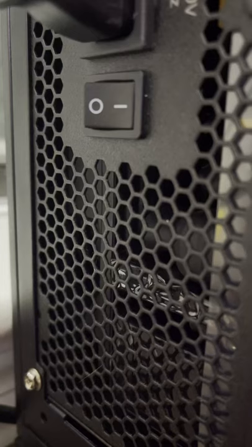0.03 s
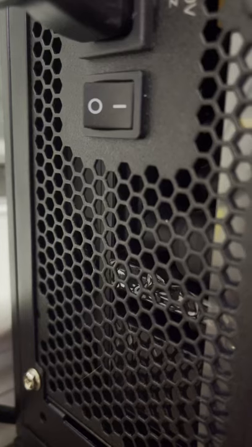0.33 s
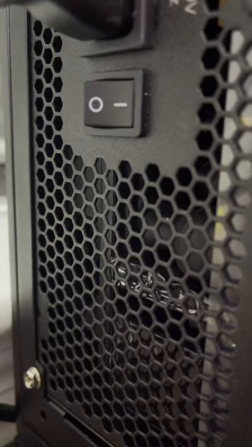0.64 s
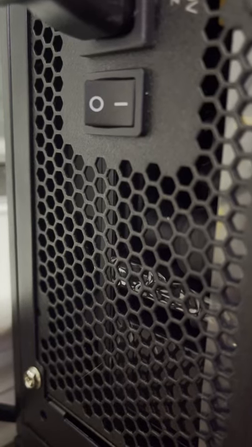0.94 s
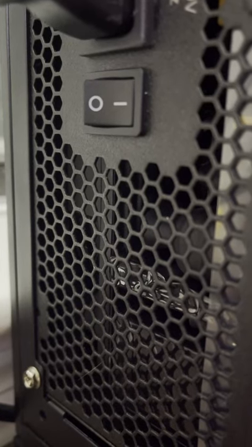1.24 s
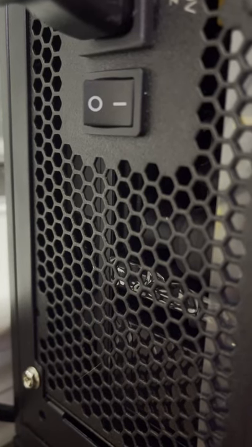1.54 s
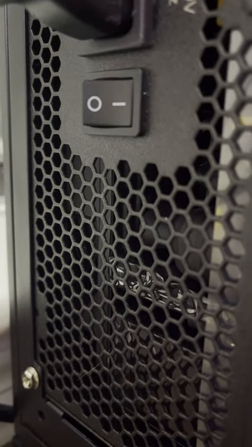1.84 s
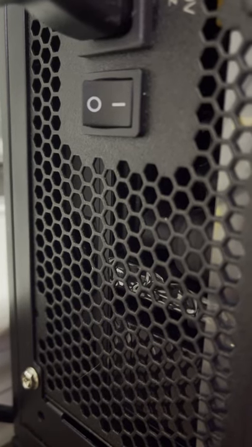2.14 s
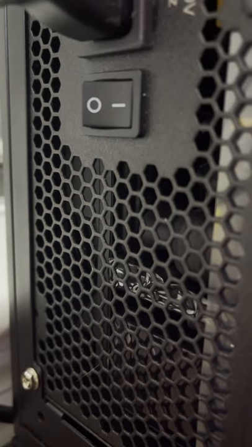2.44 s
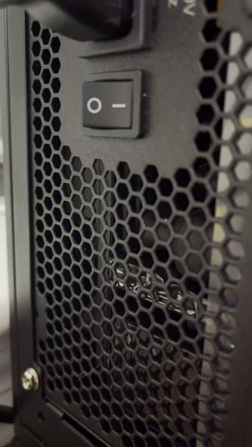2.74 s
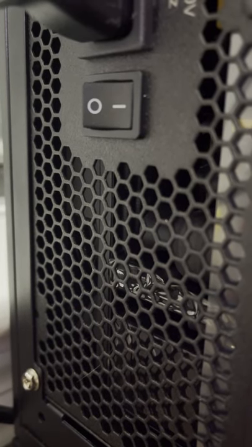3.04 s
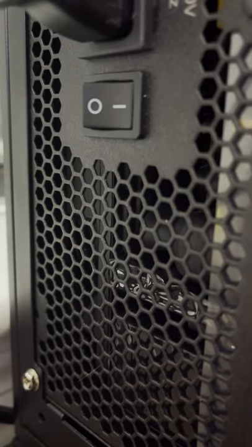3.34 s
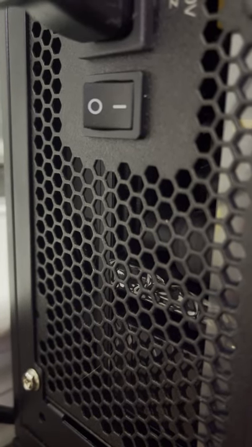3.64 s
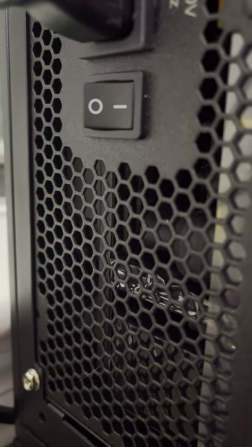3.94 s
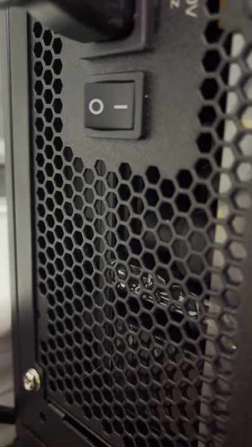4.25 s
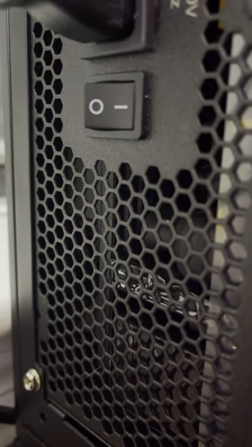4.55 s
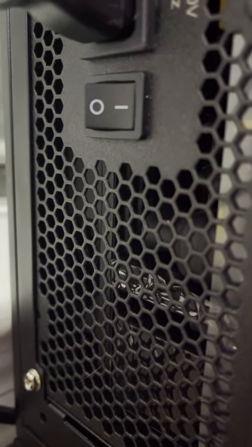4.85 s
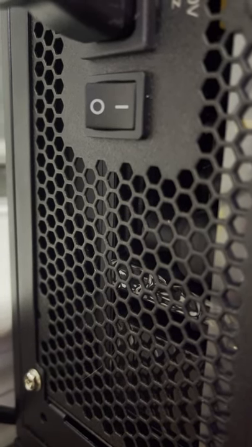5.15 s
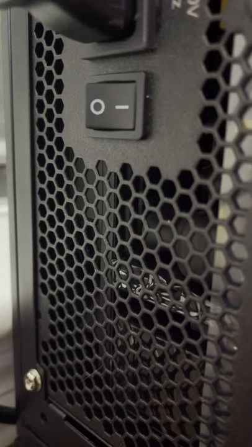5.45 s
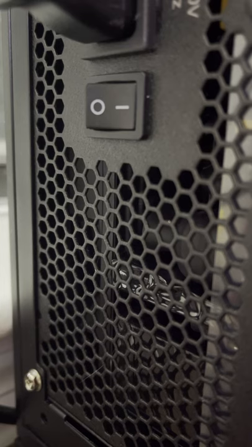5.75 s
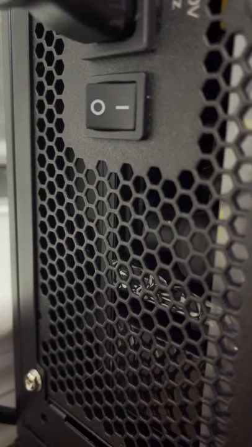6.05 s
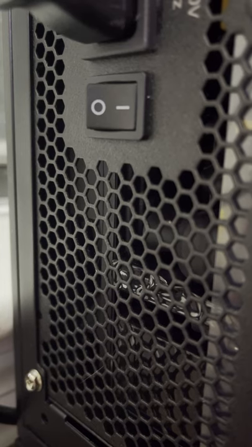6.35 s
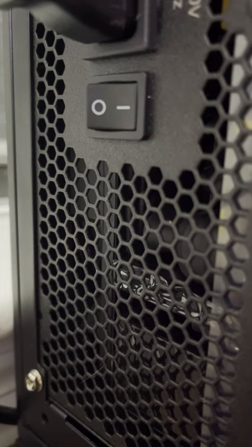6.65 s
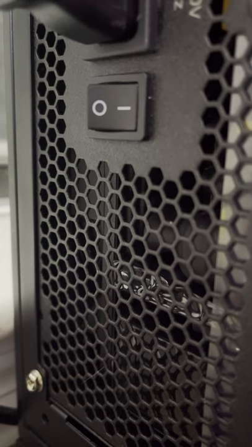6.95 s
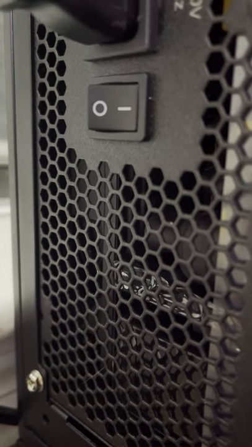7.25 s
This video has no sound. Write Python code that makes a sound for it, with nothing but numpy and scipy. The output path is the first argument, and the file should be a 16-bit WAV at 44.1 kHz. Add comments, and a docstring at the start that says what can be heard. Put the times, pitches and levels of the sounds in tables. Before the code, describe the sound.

From the start to the end, about seven and a half seconds later, a computer's fans make a soft, steady, low rush of air, heard in stereo close to the power supply grille in a quiet room. A faint low hum is blended into the air, its tones slowly swelling and fading as two fans turn at almost the same speed. On top, quieter than the air, the power supply's coils make a continuous fine electrical buzz with a high sizzle and a thin whine. The buzz rasps slightly harder for an instant at about 0.6 and 2.7 seconds, and more faintly at 5.8 and 6.9 seconds. Its ringing edge grows a little until about 3.5 seconds, then eases. At around 7.3 seconds the buzz and whine dip twice very quickly and return, while the fans keep running evenly.

```python
"""Computer fans push a low rush of air through the case, heard close to the power supply grille.
The room is quiet. The fans hum faintly; two spin at almost the same speed, so their blade tones
slowly swell and fade together. The power supply's coils buzz and whine as the current through them
pulses 144 times a second, and they go quieter for a moment near the end, when less is drawn."""
import sys
import numpy as np
from scipy import signal
from scipy.fft import rfft, irfft
from scipy.io import wavfile

SR = 44100
rng = np.random.default_rng(int(sys.argv[2]) if len(sys.argv) > 2 else 0)


def wav_out(sig):
    """Save sig, one row per channel (or a flat mono array), as 16-bit PCM at SR to the path in sys.argv[1]."""
    wavfile.write(sys.argv[1], SR, np.round(np.clip(np.atleast_2d(sig).T, -1, 1) * 32767).astype(np.int16))


N = 326340
TIME, FREQ = np.arange(N) / SR, np.fft.rfftfreq(N, 1 / SR)
LOAD_HZ = 143.92  # pulses of current each second


def amp(db):
    """Turns decibels into a number to multiply by."""
    return 10 ** (np.asarray(db) / 20)


def unit(x):
    """Scales a signal to an average size (rms) of one."""
    return x / np.sqrt(np.mean(x ** 2) + 1e-20)


def across(points):
    """Joins (f/Hz, value) points into a curve over all frequencies, on a log axis."""
    hz, value = np.transpose(points)
    return np.interp(np.log(FREQ + 1), np.log(hz + 1), value)


def bell(hz, width):
    """One resonance: a hump around hz, with height 1."""
    return 1 / (1 + (2 * (FREQ - hz) / width) ** 2)


def modes(table):
    """Several resonances in one curve; their powers add."""
    return np.sqrt(sum((amp(db) * bell(hz, width)) ** 2 for hz, width, db in table))


def drift(per_s):
    """Slow random wandering, with an average size of one."""
    steps = TIME[::64]
    hz = np.fft.rfftfreq(len(steps), steps[1])
    slow = rfft(rng.standard_normal(len(steps))) * np.exp(-(hz / per_s) ** 2) * (hz > 0)
    return np.interp(TIME, steps, unit(irfft(slow, len(steps))))


def ring(x, gain):
    """Filters x so that resonances ring after each push, never before it."""
    log_gain = np.log(np.maximum(gain, 1e-5))
    cepstrum = irfft(log_gain, N) * (1 + np.sign(N / 2 - np.arange(N)))
    return irfft(rfft(x) * np.exp(log_gain + 1j * rfft(cepstrum).imag), N)


# how far the left side runs ahead of the right (f/Hz, lead/radians)
LEFT_LEAD = [(230, 0), (430, 0.17), (600, 0.66), (690, 0.62), (850, 1.84), (950, 1.5), (1035, 1.7),
             (1130, 4.5), (1250, 5.5), (1500, 5.5), (1800, 6.3), (2040, 6.3), (2350, 6), (2670, 7.5),
             (2890, 6.1), (3000, 8.7), (3130, 6.4), (3420, 6.4), (3580, 8.4), (3720, 6.6), (4000, 6.9),
             (4190, 5.7), (4330, 8.6), (4450, 8.1), (4650, 8.3), (4830, 9.4), (5200, 11), (5600, 12.5),
             (6500, 12.8), (7050, 13.9), (8000, 14.8), (8700, 15.65), (9550, 15.75), (9750, 16.2),
             (10400, 16.9), (11250, 17.7), (11900, 18.7), (13200, 18.9), (13600, 19.4)]
# how alike the two sides sound (f/Hz, likeness/0-1)
LIKENESS = [(220, 1), (320, .96), (520, .88), (600, .93), (750, .52), (840, .85), (930, .4), (1030, .8),
            (1200, .35), (1500, .76), (1800, 1), (2040, .98), (2430, .15), (2700, .75), (2870, .9),
            (2960, .35), (3300, .87), (3600, .4), (3850, .35), (4060, .86), (4250, .3), (4450, .65),
            (4700, .45), (4880, .92), (5400, .72), (5700, 1), (6250, .98), (6900, .65), (7100, .82),
            (7800, .62), (8200, .92), (8800, 1), (9550, 1), (9950, .78), (10400, .91), (10850, .97),
            (11600, .89), (12000, .97), (13200, .97), (13600, .72)]
# how much louder the left side is (f/Hz, level/dB)
LEFT_LOUDER = [(230, 0), (300, 1.5), (430, 3.5), (550, 5), (710, 0), (860, 1), (920, 5.5), (1050, 7),
               (1150, 1.5), (1320, 3.5), (1520, 3.3), (1680, -0.5), (2020, 0), (2150, -3.3), (2470, -2.5),
               (2570, 5), (2760, 3), (2930, -7), (3060, 1.5), (3300, -1), (3530, -5.5), (3700, 0),
               (4200, -2), (4420, 4.5), (5000, -2), (5400, 1), (5700, -1)]

def stereo(direct, scattered, bass_apart=0.033):
    """Direct sound reaches two microphones out of step; scattered sound makes them less alike."""
    side = np.array([[1], [-1]])
    apart = np.clip(1 + bass_apart - np.exp(-(FREQ / 220) ** 4), 0, 1)  # long waves reach both alike
    same = 1 - apart * (1 - np.clip(across(LIKENESS), 0, 1))
    pair = np.sqrt((1 + same) / 2) * rfft(direct) + side * np.sqrt((1 - same) / 2) * rfft(scattered)
    lean = amp(side * apart * across(LEFT_LOUDER) / 2)
    lean = lean / np.sqrt(np.mean(lean ** 2, axis=0))
    right_lag = np.exp(1j * np.array([[0], [-1]]) * apart * across(LEFT_LEAD))
    return irfft(pair * lean * right_lag, N)


# how strong the rushing air is, from low to high (f/Hz, relative level/dB)
AIR_COLOUR = [(20, -23), (38, -14.5), (68, -0.5), (102, -5.5), (175, -4.5), (230, -8), (310, -11),
              (420, -14.5), (660, -17), (900, -20.5), (1300, -28.5), (2000, -36), (3000, -44), (14000, -54)]
# pitches that the hollow case boosts or cancels (f/Hz, width/Hz, boost/dB)
CASE_RESONANCES = [(98, 11, -3.5), (138, 12, -2), (242, 21, -2.5), (590, 100, 1.4), (661, 45, -5.5),
                   (700, 91, 3), (823, 44, 3), (1017, 86, 5.5), (1170, 53, -2), (1225, 78, 2),
                   (1360, 55, -1), (1460, 32, 4.5), (2020, 130, 4.5)]

def rushing_air(level_db=-42, gust_db=0.7, gusts_per_s=7):
    """Air swirls at the blades and grille, and the hollow case shapes the noise."""
    colour = amp(across(AIR_COLOUR) + sum(db * bell(hz, width) for hz, width, db in CASE_RESONANCES))
    rush = unit(ring(rng.standard_normal((2, N)), colour))
    gusts = amp(gust_db * drift(gusts_per_s))
    return amp(level_db) * stereo(*(rush * gusts))


# tones of a fan and its twin; a negative strength means the twin works against the fan
# (multiple of the blade rate, main fan's level/dB, twin's relative strength)
TWIN_TONES = [(1, -53, -0.038), (2, -66.5, 0.17), (3, -63, 0.9), (4, -56.5, 0.58), (5, -72.5, 0.4),
              (6, -80, 0.086), (7, -66.5, -0.42), (8, -78, 0.3)]
# how much faster the twin's blades go by (t/s, extra f/Hz)
TWIN_EXTRA_SPEED = [(0, 0.32), (1.8, 0.2), (3, 0.17), (4.9, 0.1), (7.4, 0.18)]
# hums of the other fans, the mains power and the panels they shake (f/Hz, level/dB)
CASE_HUMS = [(58.5, -54.5), (69.3, -52.5), (80.7, -49), (84.8, -54), (107.7, -55), (119.8, -53),
             (150.7, -56), (168.9, -54.5), (187.1, -57), (219, -69.5), (258.4, -59), (281, -66),
             (290, -65.5), (301.5, -59.5), (312.5, -66), (350.6, -60.5), (467, -68.5), (615.7, -70.5),
             (642, -73), (753, -72)]

def fan_tones(blade_hz=148.43, in_step_s=1.675, speed_wander=0.00026, hum_wander=0.001396,
              blade_flutter_db=0.63, hum_flutter_db=1.1):
    """Twin fans slip in and out of step, so their tones beat; uneven airflow makes each tone flutter."""
    blade_passes = np.cumsum(blade_hz * (1 + speed_wander * drift(1.12))) / SR
    lead = np.cumsum(np.interp(TIME, *np.transpose(TWIN_EXTRA_SPEED))) / SR
    lead -= np.interp(in_step_s, TIME, lead)
    tracks = []
    for multiple, db, twin in TWIN_TONES:
        beating = 1 + twin * np.exp(2j * np.pi * round(multiple) * lead)
        tracks.append((round(multiple) * blade_passes, amp(db + blade_flutter_db * drift(5.9)) * beating))
    for hz, db in CASE_HUMS:
        cycles = np.cumsum(hz * (1 + hum_wander * drift(1.0))) / SR
        tracks.append((cycles, amp(db + hum_flutter_db * drift(2.7))))
    tones = sum(gain * np.exp(2j * np.pi * (cycles + rng.random())) for cycles, gain in tracks)
    return np.sqrt(2) * stereo(tones.real, tones.imag)


# surges of current in each pulse, biggest first (place in the cycle/0-1, width/cycles, relative height)
CURRENT_SURGES = [(.69, .06, .85), (.8, .07, .52), (.43, .05, .45), (.56, .06, .22), (.02, .17, .42)]
# weaker ripples in the current, which beat against the pulses (f/Hz, depth/0-1)
CURRENT_RIPPLES = [(2.99, .035), (83.89, .065), (93.67, .12)]

def coil_drive(idle=0.69, uneven_db=1.1, jitter_s=.00001):
    """What shakes the coils: the surging current, and a sharp tick at each cycle's biggest surge."""
    cycles = TIME * LOAD_HZ
    cycle = cycles.astype(int)
    size, delay = rng.standard_normal((cycle[-1] + 1, 2)).T
    surges = sum(height * np.exp(-(((cycles - place + .5) % 1 - .5) / width) ** 2)
                 for place, width, height in CURRENT_SURGES)
    ripple = sum(depth * np.sin(2 * np.pi * (hz * TIME + rng.random())) for hz, depth in CURRENT_RIPPLES)
    current = unit((idle + surges * amp(uneven_db * size[cycle])) * (1 + ripple))
    # the ticks repeat almost exactly, so they blend into faint tones
    samples_from_tick = ((cycles % 1 - CURRENT_SURGES[0][0]) / LOAD_HZ + jitter_s * delay[cycle]) * SR
    ticks = unit(np.sinc(samples_from_tick) * np.exp(-(samples_from_tick / 10) ** 2))
    return current, ticks


# pitches at which the coils' solid cores and their housing ring (f/Hz, width/Hz, relative level/dB)
CORE_RINGS = [(2642, 162, -9.5), (2757, 130, -10), (2849, 88, -7.5), (3070, 200, -15.5), (3290, 180, -12),
              (3490, 190, -13.5), (3760, 60, -20), (3870, 60, -18), (4048, 146, -11), (4210, 80, -15.5),
              (4450, 150, -13.5), (4600, 70, -16), (5030, 116, -10), (5177, 110, -10.5), (5300, 120, -11.5),
              (5465, 76, -22), (5745, 200, -15)]
# pitches at which the wire wound on the cores rings (f/Hz, width/Hz, relative level/dB)
WIRE_RINGS = [(7050, 190, -13.5), (7310, 240, -13), (7630, 240, -15.5), (8130, 100, -10.5), (8255, 125, -3),
              (8370, 115, -5), (8485, 100, -5.5), (8640, 110, -10.5), (8900, 120, -12), (9070, 140, -7.5),
              (9280, 240, -7.5), (10330, 330, -6.3), (10700, 280, -1), (10950, 270, 1), (11210, 380, 1),
              (11550, 230, -7), (11910, 300, -10.3), (13600, 450, -16.3)]
# the wire's broad sizzle (f/Hz, relative level/dB)
WIRE_SIZZLE = [(800, -49), (2300, -19), (4700, -23.5), (5600, -20.5), (6400, -20.5), (8000, -15),
               (10000, -11.5), (12400, -19.5), (13200, -22), (14000, -41)]

def coil_buzz(level_db=-52, core_tick=0.14, core_rattle=0.96, wire_tick=0.27,
              core_waver_db=-0.16, wire_waver_db=0.15, core_follow=.6):
    """Surges of current make the cores and wire tick and rattle, and each rings at its own pitches."""
    current, ticks = coil_drive()
    cores = core_tick * ticks + core_rattle * current * rng.standard_normal((2, N))
    cores *= amp(core_waver_db * drift(13))
    wire = wire_tick * ticks + current * rng.standard_normal((2, N))
    wire *= amp(wire_waver_db * drift(7))
    load = current_drawn()
    rasp = ring(cores * load ** core_follow, modes(CORE_RINGS))  # the cores fade less in a lull
    sizzle = ring(wire * load, np.hypot(modes(WIRE_RINGS), amp(across(WIRE_SIZZLE))))
    return amp(level_db) * stereo(*unit(core_swells(rasp) + sizzle))


# thin tones of the cores (multiple of the pulse rate, level/dB)
WHINE_TONES = [(18, -83.5), (20, -79.5), (23, -84.5), (35, -87), (36, -79), (39, -91), (45, -94)]

def coil_whine(waver_db=2.0, wavers_per_s=5):
    """The cores sing thin, high tones at a few multiples of the current's pulse rate."""
    tones = 0
    for multiple, db in WHINE_TONES:
        gain = amp(db + waver_db * drift(wavers_per_s))
        tones += gain * np.exp(2j * np.pi * (round(multiple) * LOAD_HZ * TIME + rng.random()))
    tones *= current_drawn()
    return np.sqrt(2) * stereo(tones.real, tones.imag)


# rumble that each microphone picks up alone (f/Hz, relative level/dB)
RUMBLE_COLOUR = [(20, -17), (50, -16), (85, 6), (120, -14), (160, 9), (250, 4), (500, -37)]

def rumble(level_db=-70.5):
    """A faint low rumble, unrelated between left and right."""
    colour = amp(across(RUMBLE_COLOUR)) * (FREQ < RUMBLE_COLOUR[-1][0])
    return amp(level_db) * unit(irfft(rfft(rng.standard_normal((2, N))) * colour, N))


# lift of the cores' low ringing, which eases about halfway through (t/s, boost/dB)
LOW_RING_BOOST = [(0, 2.5), (3.4, 5), (4, 0), (7.4, 1.5)]
# moments when the cores rasp harder (t/s, half-length/s, f/Hz, boost/dB)
HARD_RASPS = [(0.578, .028, 3000, 6), (2.703, 0.029, 3200, 5.5), (5.81, .026, 3430, 4.5),
              (6.91, 0.027, 2870, 3)]

def core_swells(rasp, low_hz=2970, low_width_hz=150, rasp_width_hz=740):
    """Parts of the cores' ringing grow louder: one band slowly, others in short flares."""
    swells = [(low_hz, low_width_hz, np.interp(TIME, *np.transpose(LOW_RING_BOOST)))]
    for at_s, half_s, hz, db in HARD_RASPS:
        swells.append((hz, rasp_width_hz, db * np.exp(-((TIME - at_s) / half_s) ** 2)))
    for hz, width, boost_db in swells:
        band = irfft(rfft(rasp) * bell(hz, width), N)
        rasp = rasp + band * (amp(boost_db) - 1)
    return rasp


# short lulls when the computer draws less current (t/s, length/s, change in level/dB)
CURRENT_LULLS = [(7.272, 0.017, -17), (7.367, 0.02, -7)]

def current_drawn(fall_s=0.0064, recover_s=0.02):
    """The load stays at 1, except in a lull, where it drops quickly, holds, then comes back."""
    change_db = 0
    for start_s, length_s, db in CURRENT_LULLS:
        falling = (TIME - start_s) / fall_s
        recovering = 1 - (TIME - start_s - length_s) / recover_s
        change_db += db * np.clip(np.minimum(falling, recovering), 0, 1)
    return amp(change_db)


def scene():
    """Air, fan tones, coil buzz and whine come from the same grille, over a faint rumble."""
    return rushing_air() + fan_tones() + coil_buzz() + coil_whine() + rumble()


def record(dry, start_s=.035, fade_s=.002, cutoff_hz=13830):
    """The sound starts after a tiny silence, and its very highest treble is cut away."""
    opened = dry * np.clip((TIME - start_s) / fade_s, 0, 1)
    low_pass = signal.firwin(801, cutoff_hz, window=("kaiser", 9), fs=SR)
    return signal.oaconvolve(opened, low_pass[None], "same", axes=1)


dry = scene()
out = record(dry)
wav_out(out)
```